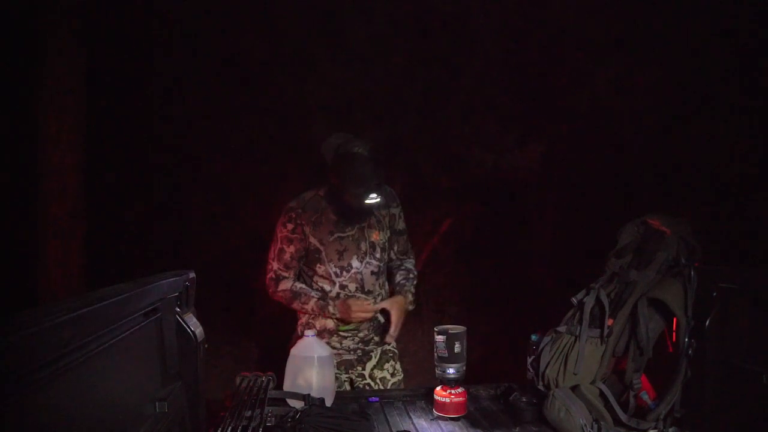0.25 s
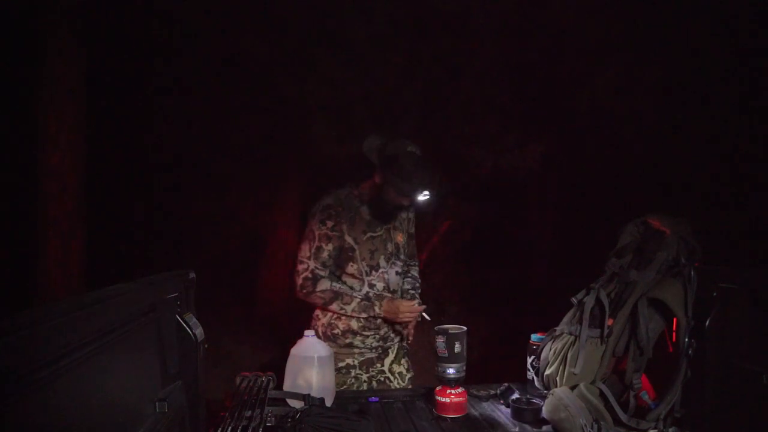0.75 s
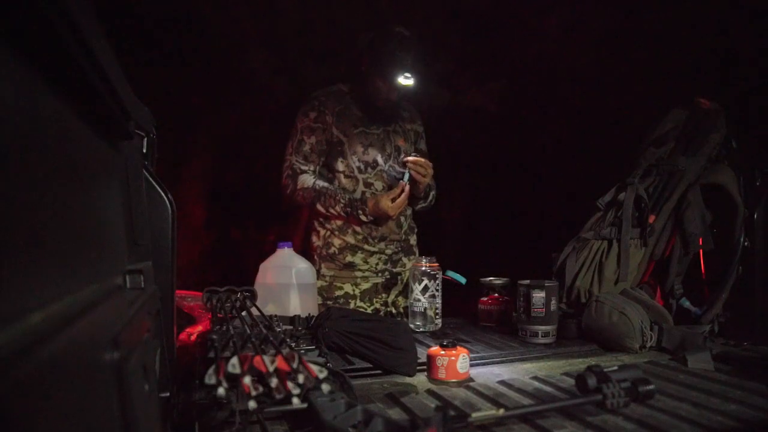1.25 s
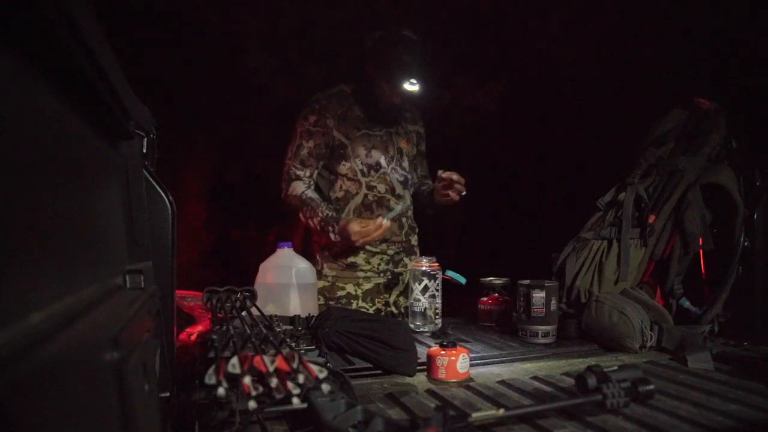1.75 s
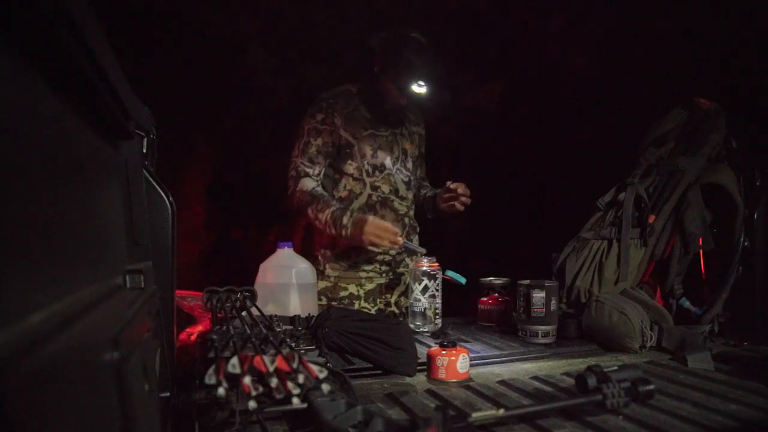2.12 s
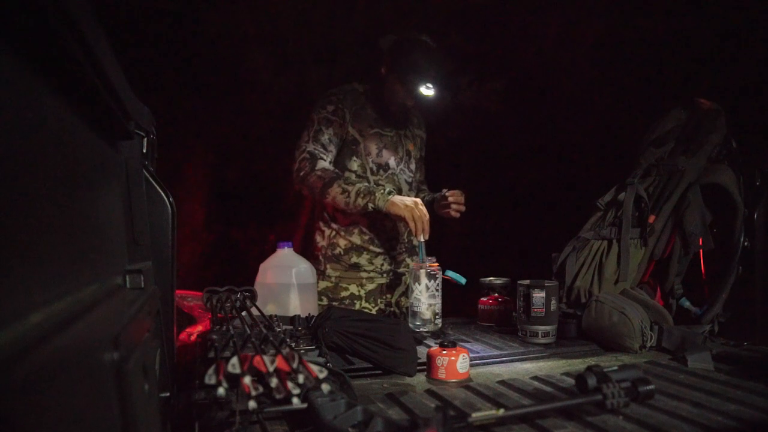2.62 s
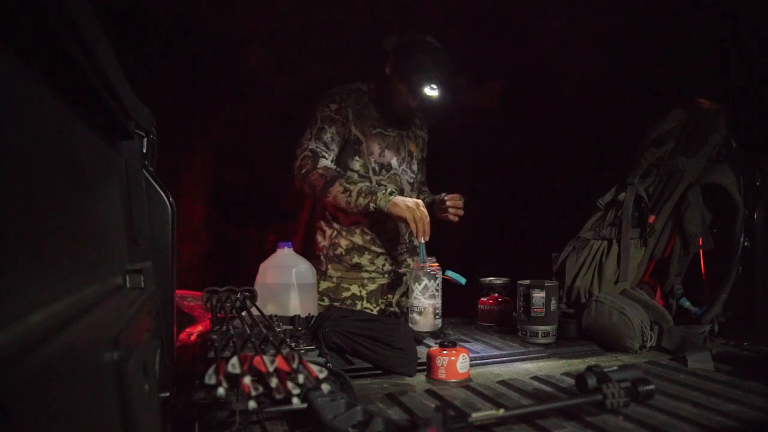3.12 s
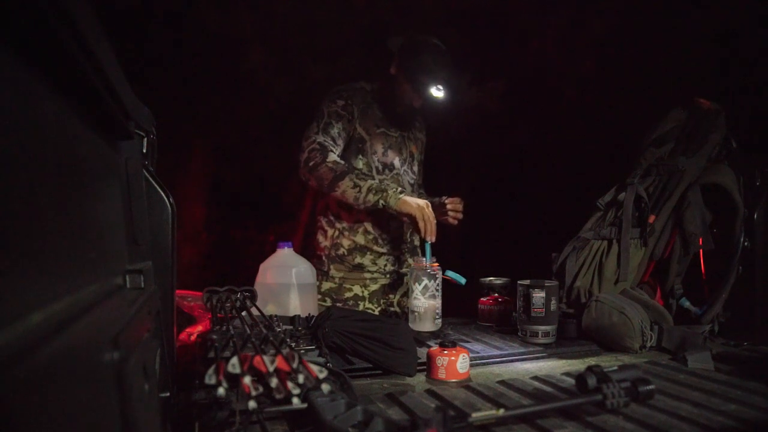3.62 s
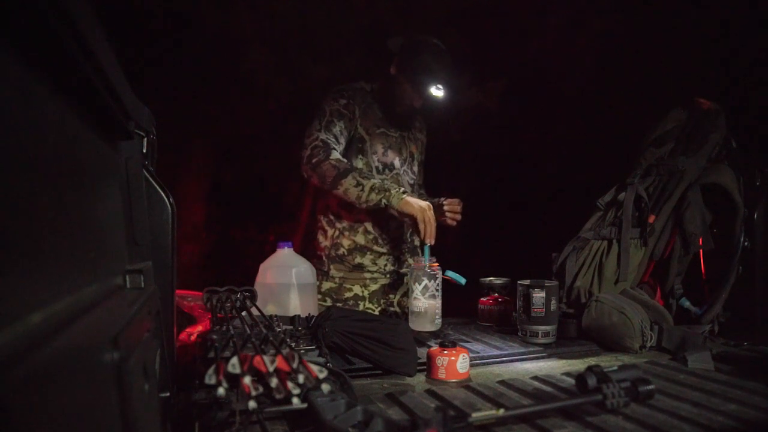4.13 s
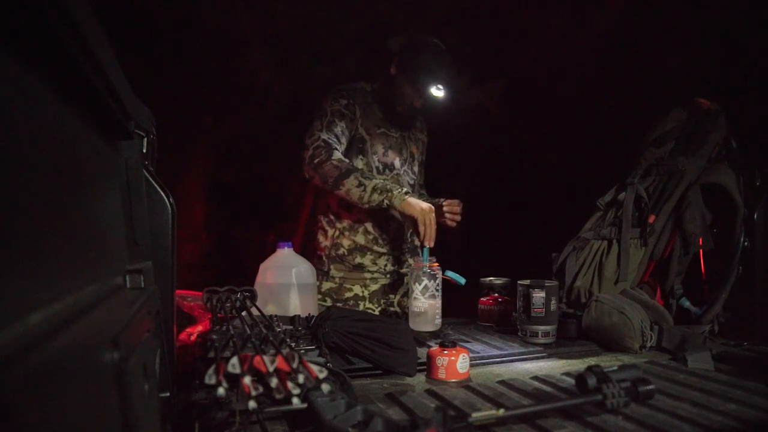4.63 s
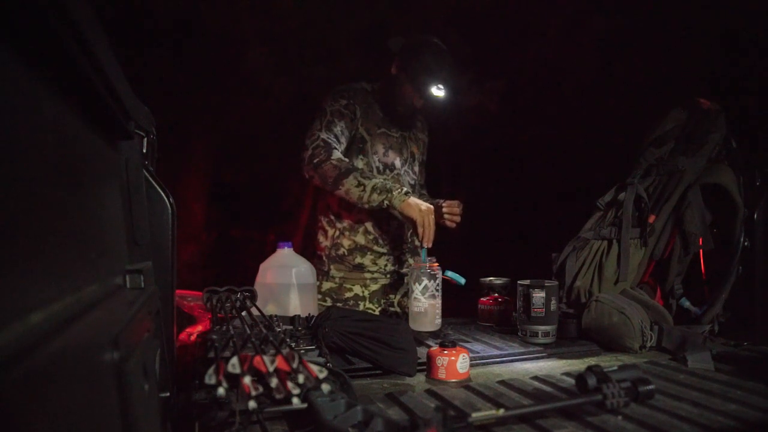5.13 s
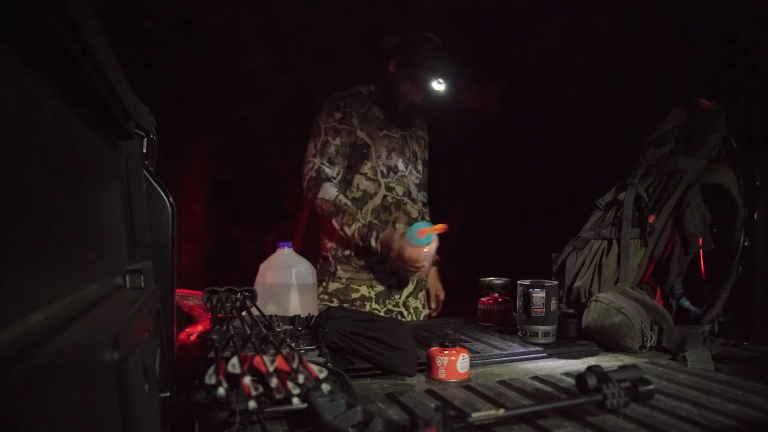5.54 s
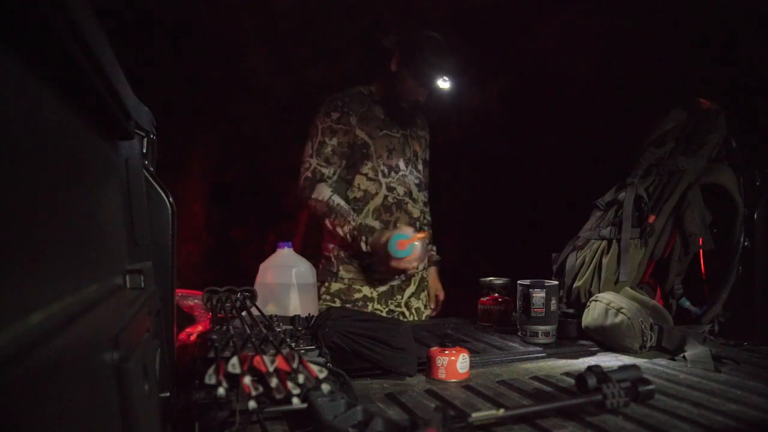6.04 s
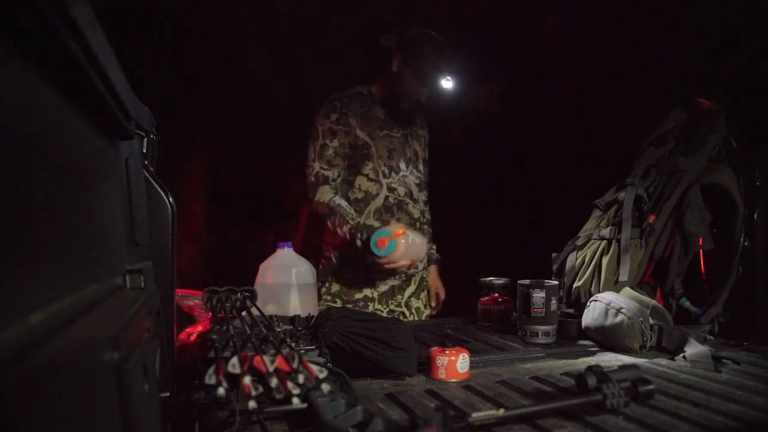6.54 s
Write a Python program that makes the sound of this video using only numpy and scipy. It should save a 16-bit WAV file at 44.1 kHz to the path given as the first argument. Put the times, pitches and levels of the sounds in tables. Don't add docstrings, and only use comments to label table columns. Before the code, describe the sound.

Night outdoors: burner hiss cuts off to crackling foil, trickling powder, rapid hollow stirring knocks, then brisk sloshing in a bottle over engine rumble.

```python
import sys
import numpy as np
from scipy import signal
from scipy.fft import rfft, irfft, next_fast_len
from scipy.io import wavfile
from scipy.ndimage import uniform_filter1d, map_coordinates

SR = 44100
rng = np.random.default_rng(int(sys.argv[2]) if len(sys.argv) > 2 else 0)


def ratio_of_db(decibels):
    return 10 ** (np.asarray(decibels, float) / 20)


def pcm_store(signal):
    levels = np.round(np.clip(np.atleast_2d(signal), -1, 1) * 32767)
    wavfile.write(sys.argv[1], SR, levels.astype(np.int16).T)


N = 298998
T = np.arange(N) / SR

# (frequency [Hz], density [dB per Hz])
FLAME_SPECTRUM = [(700, -31.5), (1400, -13.5), (2200, 1), (3200, -3), (3800, -12), (5000, -40)]
# (frequency [Hz], density [dB per Hz])
JET_SPECTRUM = [(2500, -40), (3400, -4), (4200, -2.5), (5200, -9.5), (6600, -15.5), (9400, -19.5),
                (12300, -23.5), (13200, -36), (15600, -47)]
# (frequency [Hz], width [Hz], level over the jet [dB])
POT_MODES = [(2010, 60, 9), (2360, 90, 7.5), (2770, 33, 11), (3080, 40, 5), (3510, 110, 9.5),
             (4160, 66, 9.5), (4700, 120, 11), (5100, 80, 5), (5750, 100, 3), (6180, 110, 11),
             (7000, 110, 10), (8500, 120, 3), (9400, 200, 3), (10800, 150, 3), (12010, 260, 12),
             (12500, 150, 4)]
# (start [s], end [s], firing rate [Hz])
ENGINE_SCENES = [
    (-.1, .95, 26),
    (0.949, 5.4, 37.65),
    (5.4, 6.9, 26.87),
]
# (multiple of firing rate [1], level [dB])
ENGINE_ORDERS = [
    [(1, 0), (1.82, -7), (3.8, -16)],
    [(1, 0), (2, -12), (3, -15), (3.93, -17), (5.87, -17), (6.4, -20), (7.87, -21)],
    [(1, 0), (1.5, -18)],
]
# (time [s], level [dB])
THROB_LEVEL = [(0, -15.5), (.9, -15.5), (1, -14), (2, -14), (2.3, -15), (3.5, -13.5), (4.6, -14), (5, -17),
               (5.3, -21), (5.45, -14), (6.25, -15), (6.5, -22), (6.78, -26)]
# (frequency [Hz], density [dB per Hz])
RUMBLE_SPECTRUM = [(5, -23), (11, -0.5), (20, 0.5), (28, -8.5), (48, -10.5), (62, -15), (85, -7.5),
                   (130, -9), (220, -16.5), (268, -24.5), (340, -18.5), (420, -35.5), (650, -70.5)]
# (frequency [Hz], density [dB per Hz])
DRONE_SPECTRUM = [(180, -23), (300, -4.5), (520, -10.5), (600, -12.5), (1000, -16), (1400, -20.5),
                  (1900, -25.5), (3300, -29), (4400, -38), (5800, -42.5), (7000, -47.5), (13000, -58.5),
                  (15600, -69)]
# (frequency [Hz], width [Hz], level [dB])
CASING_MODES = [
    [(305, 20, 4), (452, 12, 8), (549, 14, 5), (942, 20, 4)],
    [(576, 14, 4), (937, 10, 9), (1017, 10, 4), (1098, 10, 10), (1330, 16, 8), (1690, 20, 5), (1771, 16, 6),
     (5850, 500, 1)],
]
RUMBLE_LEVELS = [-17.7, -18.3, -18.5]
DRONE_LEVELS = [-29.8, -31.3, -31]
# (first stroke [s], last stroke [s], level [dB], pitch [Hz])
CHIRP_PHRASES = [(.3, .41, -46, 3950), (1.098, 1.2, -42, 4000), (1.752, 1.856, -43, 3950),
                 (2.25, 2.352, -44, 3950), (2.945, 3.05, -46, 4000), (3.59, 3.645, -43, 3980),
                 (4.08, 4.185, -46, 3950), (1.713, 1.713, -41, 3550), (1.91, 1.91, -43, 3780),
                 (2.07, 2.11, -42, 3580), (3.522, 3.522, -42, 3600), (3.68, 3.68, -42, 3580),
                 (1.147, 1.257, -41, 3720), (1.389, 1.489, -43, 3590), (1.642, 1.74, -42, 3600),
                 (1.786, 1.854, -42, 3550), (2.027, 2.171, -46, 3600), (2.428, 2.6, -43, 3620),
                 (2.82, 2.92, -47, 3620), (2.989, 3.039, -41, 3660), (3.167, 3.261, -42, 3620),
                 (3.364, 3.41, -43, 3620), (3.446, 3.5, -42, 3670), (3.598, 3.628, -41, 3570),
                 (3.736, 3.736, -42, 3620), (3.997, 4.041, -43, 3660), (4.402, 4.402, -41, 3550),
                 (4.472, 4.472, -43, 3550), (4.564, 4.564, -44, 3600), (4.853, 4.853, -46, 3750),
                 (5.27, 5.325, -43, 3650), (5.38, 5.38, -41, 3650)]
# (time [s], level [dB], pitch [Hz], dull thud [dB], crisp edge [dB])
FOIL_SNAPS = [(0, -28, 6000, -10, 7), (0.9978, -15, 1450, 0, -18), (0.998, -19, 3600, -5, -8),
              (1.001, -21, 4400, -10, -10), (1.004, -24, 1500, 0, -20), (1.014, -25, 1600, 0, -25),
              (1.0393, -14, 4100, -10, -30), (1.0405, -13, 3000, -4, -36), (1.082, -14, 1300, 0, -34),
              (1.169, -31, 4000, -10, -10), (1.345, -21, 4500, -12, -32), (1.517, -22, 2500, 0, -8),
              (1.5183, -6.5, 3400, -17, -25), (1.5215, -18, 4300, -20, -20), (1.5265, -20, 3300, -20, -25),
              (1.5315, -23, 3100, -20, -25)]
# (time [s], level [dB])
POWDER_FLOW = [(2.14, -75), (2.195, -54), (2.26, -62), (2.308, -51.5), (2.518, -51.5), (2.57, -43.5),
               (2.73, -48.5), (2.91, -40.5), (2.965, -64)]
# (frequency [Hz], density [dB per Hz])
POWDER_SPECTRUM = [(1760, -34), (3000, -11), (3280, -10), (3690, 1), (4410, -14), (5310, 0), (5850, -9),
                   (6900, -16), (9150, -14.5), (10300, -18.5), (13000, -11), (15600, -27)]
# (time [s], body [dB], click [dB], spray [dB], ring [s])
SPOON_KNOCKS = [(3.5857, -19, -29, -45, .063), (3.6908, -13, -15, -42, .06), (3.7761, -5, -14, -31, .081),
                (3.8541, -5.5, -12.5, -41, .056), (3.9432, -5.5, -14.5, -40, .06),
                (4.0304, -7, -21.5, -44, .058), (4.118, -5.5, -15, -39, .056),
                (4.1975, -5.5, -17.5, -45, .054), (4.286, -7.5, -22.5, -46, .086),
                (4.3704, -9.5, -27, -51, .084), (4.449, -10.5, -16.5, -36, .09),
                (4.529, -5, -17, -39, .096), (4.6184, -9, -15.5, -38, .124), (4.7027, -4.5, -17, -39, .1),
                (4.7905, -6.5, -19.5, -38, .07), (4.886, -6.5, -18, -48, .13),
                (4.9686, -11, -17.5, -30, .095), (5.0636, -5, -15, -41, .081),
                (5.1545, -6.5, -17.5, -39, .068)]
# (pitch [Hz], twin [dB], upper [dB], lower [dB], lag [s])
BODY_MODES = [(395, -12, -12, -14, .001), (395, -8, -12, -9, 0), (393, -20, -14, -18, .0004),
              (412, -14, -7, -14, .001), (385, -18, -12, -15, 0), (408, -14, -8, -14, .002),
              (388, -18, -15, -16, .0002), (410, -16, -8, -14, .001), (388, -10, -10, -16, .0015),
              (403, -20, -12, -11, .0028), (410, -5, -16, -14, .004), (397, -20, -18, -20, .0002),
              (409, -3, -14, -14, .002), (397, -20, -20, -15, .001), (385, -6, -14, -11, 0),
              (398, -20, -18, -14, .0004), (414, -8, -14, -16, .0039), (398, -20, -10, -1, .0007),
              (389, -12, -13, -15, .0004)]
STRIKE_POINTS = [(0, 0, 0, 0), (8, -4, 2, 6), (2, -6, 5, 2), (-5, 4, -2, 7), (-3, 8, 0, -5), (-8, 9, -3, 0),
                 (5, 5, 3, -3), (-7, 4, 2, -3), (-2, -5, 5, 0), (-4, 3, 1, -2), (4, -5, 4, -2),
                 (1, 1, -2, -1), (-2, 0, 1, -6), (0, 7, 2, -6), (-4, 0, -5, -2), (3, 8, -3, -4),
                 (5, 4, -2, -5), (1, 8, 3, -12), (0, -1, 3, -8)]
# (frequency [Hz], level [dB], decay T60 [s])
WALL_MODES = [(627, -24.5, 0.057), (1000, -18.5, 0.017), (2250, -21.5, 0.016), (5000, -29, .014)]
GRAZE_TIMES = [3.579, 3.6, 3.8097, 4.8334, 5.0094]
# (body [dB], click [dB], spray [dB], ring [s])
GRAZE_FORCE = (-25, -32, -53, .11)
# (frequency [Hz], gain [dB])
CLICK_SPECTRUM = [(500, 3), (1000, -2), (1600, -5), (2200, -8.5), (3300, -9), (5200, -14), (7000, -25),
                  (10000, -32), (16000, -42)]
# (frequency [Hz], gain [dB])
SPRAY_SPECTRUM = [(4000, -26), (6500, -6), (9500, -4), (12500, 2), (14000, -3), (15700, -15)]
# (time [s], exhaust pitch [Hz], level [dB])
VEHICLE_PASS = [(4.7, 225.6, -46), (4.8, 235.5, -29), (5.43, 228.0, -30.5), (5.6, 239.8, -25.5),
                (6.32, 234.4, -26.5), (6.78, 222.4, -33)]
# (frequency [Hz], density [dB per Hz])
WASH_SPECTRUM = [(710, -62), (1200, -1.5), (1640, -1.5), (1790, -3), (2580, -2), (3350, -6), (3850, -3.5),
                 (5310, -9.5), (7500, -38.5), (9750, -54), (16500, -120)]
# (frequency [Hz], density [dB per Hz])
FOAM_SPECTRUM = [(3530, -27), (6000, -6.5), (7320, -10), (9230, -10.5), (12500, -17), (13800, -15),
                 (15600, -31)]
# (frequency [Hz], density [dB per Hz])
SLAP_SPECTRUM = [(220, -17), (380, 2), (423, -28), (461, -7.5), (792, -1), (989, -5), (1600, -21.5),
                 (2080, -40), (3520, -120)]
# (time [s], force [dB], slap over force [dB], foam over force [dB])
WATER_SURGES = [(5.526, -21.5, 2, -24), (5.61, -26, 6, -19), (5.655, -25, 2, -21), (5.7, -30, 0, -27),
                (5.76, -19, 2, -20), (5.81, -25, -5, -25), (5.89, -26, -1, -18), (5.956, -26, 1, -19),
                (6.022, -20.5, 9, -24), (6.09, -22.5, -7, -21), (6.16, -25, 3, -23), (6.225, -27, 4, -21),
                (6.28, -23, 8, -25), (6.355, -23.5, -7, -19), (6.395, -23, 3, -21), (6.535, -23, 9, -24),
                (6.575, -27, 2, -27), (6.645, -21, -4, -24), (6.765, -28, -1, -21)]
# (rise [dB per s], fall [dB per s])
SURGE_SLOPES = [
    (230, 200),
    (350, 280),
    (220, 370),
]
# (time [s], level [dB], pitch [Hz])
WATER_THUMPS = [(5.49, -12, 721), (5.5285, -2, 694), (5.607, -5, 697), (5.74, -9, 947), (5.763, 3, 810),
                (5.89, -4, 750), (5.948, -7, 665), (5.995, -11, 600), (6.018, -2, 734), (6.149, -12, 581),
                (6.405, -6, 1200), (6.512, -6, 816), (6.573, -8, 740), (6.178, -6, 533), (6.202, -3, 740),
                (6.23, -5, 931), (6.257, -3, 939), (6.288, -6, 807), (6.349, -13, 789), (6.482, -10, 541),
                (6.548, -3, 600)]
# (time [s], level [dB], pitch [Hz])
DROP_SMACKS = [(5.432, -21.5, 1820), (5.4593, -20, 3700), (5.4872, -15.5, 3740), (5.5172, -13, 2590),
               (5.5895, -15, 2240), (5.626, -16, 2510), (5.6504, -17.5, 2440), (5.734, -14, 3820),
               (5.8654, -24, 3730), (5.9433, -22.5, 2010), (5.9965, -11, 2140), (6.145, -14.5, 2910),
               (6.2158, -13, 2770), (6.2575, -16, 2240), (6.458, -24, 3660), (6.478, -22, 2650),
               (6.4956, -22, 2500), (6.5157, -18.5, 2350), (6.587, -17, 3964), (6.6255, -6, 3300),
               (6.7196, -19, 1870), (6.7513, -20.5, 2380)]


def unit(x):
    return x / np.sqrt(np.mean(x ** 2) + 1e-20)


def curves(rows, outside=None):
    s, *cols = np.transpose(rows)
    return [np.interp(T, s, c, outside, outside) for c in cols]


def wobble(rate):
    knots = rng.standard_normal(int(N * rate / SR) + 4)
    return np.interp(T, T[::8], map_coordinates(knots, [T[::8] * rate]))


def along(points, hz):
    f, v = np.transpose(points)
    return ratio_of_db(np.interp(np.log(hz + 1), np.log(f + 1), v))


def band(hz, width_hz):
    return lambda f: (f * width_hz) ** 2 / ((f * f - hz * hz) ** 2 + (f * width_hz) ** 2)


def ping(hz, db, t60):
    t = T[:4096]
    return ratio_of_db(db - 60 * t / t60) * np.sin(2 * np.pi * hz * t)


def burst(colour, t60):
    t = T[:4096]
    noise = rfft(rng.standard_normal(len(t)))
    noise = irfft(noise * colour(np.fft.rfftfreq(len(t), 1 / SR) + 1))
    return unit(noise) * ratio_of_db(-60 * t / t60) * (1 - np.exp(-t / 0.00041))


def rush(spectrum, patchy_db, peaks=(), grain=0, size=(6, 8)):
    z = signal.stft(rng.standard_normal(N) * ratio_of_db(grain * wobble(500)), nperseg=512)[2]
    patches = uniform_filter1d(rng.standard_normal(z.shape), size[0], 0)
    patches = uniform_filter1d(patches, size[1], 1)
    x = signal.istft(z * ratio_of_db(patchy_db * unit(patches)), nperseg=512)[1][:N]
    m = next_fast_len(N, True)
    hz = np.fft.rfftfreq(m, 1 / SR)
    power = 1 + sum(ratio_of_db(2 * db) / (1 + (2 * (hz - c) / w) ** 2) for c, w, db in peaks)
    return unit(irfft(rfft(x, m) * along(spectrum, hz) * np.sqrt(power), m)[:N])


def add(out, s, x):
    part = out[max(round(s * SR), 0):][:len(x)]
    part += x[:len(part)]


def burner():
    cut_db = -np.clip(T - .975, 0, .1) * 1100
    flare_db = 3 * np.exp(-(T / .3) ** 2)
    flicker_db = .6
    flame_db = -38.8 + flare_db + flicker_db * wobble(6) + cut_db
    jet_db = -38.8 - .7 * flare_db + flicker_db * wobble(4) + cut_db
    flame = rush(FLAME_SPECTRUM, patchy_db=1.8, peaks=POT_MODES, size=(2, 30))
    jet = rush(JET_SPECTRUM, patchy_db=1.8, peaks=POT_MODES, size=(2, 30))
    return ratio_of_db(flame_db) * flame + ratio_of_db(jet_db) * jet


def engine():
    throb = np.zeros(N)
    for (start, end, hz), orders in zip(ENGINE_SCENES, ENGINE_ORDERS):
        turns = np.cumsum(hz * (1 + 0.0031 * wobble(3))) / SR
        gate = np.clip(np.minimum(T - start, end - T) / 0.023 + .5, 0, 1)
        for k, db in orders:
            unsteady_db = min(k // 2, 1) * 2.55 * wobble(5)
            throb += gate * ratio_of_db(db + unsteady_db) * np.sin(2 * np.pi * (k * turns + rng.random()))
    second, third = ENGINE_SCENES[1][0], ENGINE_SCENES[2][0]
    which = np.searchsorted([second, third], T)
    load_db = .8 * wobble(2.5)
    rumble_db = np.take(RUMBLE_LEVELS, which) + load_db
    drone_db = np.take(DRONE_LEVELS, which) + .5 * load_db + 2.5
    rumble = rush(RUMBLE_SPECTRUM, patchy_db=0.77)
    first_drone, later_drone = [rush(DRONE_SPECTRUM, patchy_db=0.83, peaks=p) for p in CASING_MODES]
    drone = np.where(T < second, first_drone, later_drone)
    return ratio_of_db(curves(THROB_LEVEL)[0] + 2.5) * throb + ratio_of_db(rumble_db) * rumble + ratio_of_db(drone_db) * drone


def crickets():
    out, t = np.zeros(N), T[:round(.03 * SR)]
    stroke_gap_s = .052
    strokes = []
    for first, last, db, hz in CHIRP_PHRASES:
        for at in np.linspace(first, last, round((last - first) / stroke_gap_s) + 1):
            strokes.append((at, db + rng.normal(0, 1.5), hz * (1 + rng.normal(0, .012))))
    chorus_db = -49.7 + 1.5 * wobble(1)
    places = np.linspace(0, 1, 500) + rng.normal(0, .001, 500)
    for place, (loudness, tuning) in zip(places, rng.random((500, 2))):
        swell_db = chorus_db[round(np.clip(place, 0, 1) * (N - 1))]
        strokes.append((6.78 * place, swell_db + 0.5 + 4 * loudness, 3430 + 400 * tuning))
    for at, db, hz in strokes:
        pitch = hz * (1 + .11 * (.5 - t / t[-1]))
        tone = np.sin(np.pi * t / t[-1]) * np.sin(2 * np.pi * np.cumsum(pitch) / SR)
        add(out, at - t[-1] / 2, ratio_of_db(db + .3) * tone)
    return out * (1 + .4 * wobble(350))


def sachet():
    flow_db = curves(POWDER_FLOW, -120)[0] + 3
    out = ratio_of_db(flow_db) * rush(POWDER_SPECTRUM, patchy_db=0.0, grain=1.2)
    for s, db, hz, thud_db, crisp_db in FOIL_SNAPS:
        t60 = .044 + .001 * db
        snap = ping(hz, 3, .5 * t60)
        snap += ratio_of_db(-5) * burst(band(hz, 0.35 * hz), t60)
        snap += ratio_of_db(-17) * burst(band(hz, 1.1 * hz), .5 * t60)
        snap += ratio_of_db(thud_db) * burst(band(1350, 900), t60)
        snap += ratio_of_db(crisp_db) * burst(band(10000, 14000), 0.67 * t60)
        add(out, s, ratio_of_db(db - 4.5) * snap)
    return out


def spoon():
    def click_colour(f):
        return along(CLICK_SPECTRUM, f)

    def spray_colour(f):
        return along(SPRAY_SPECTRUM, f)

    out, t = np.zeros(N), T[:4096]
    pair_hz, upper_hz, lower_hz = 398, 476, 345
    knocks = list(zip(SPOON_KNOCKS, BODY_MODES, STRIKE_POINTS))
    knocks += [((s, *GRAZE_FORCE), BODY_MODES[0], STRIKE_POINTS[0]) for s in GRAZE_TIMES]
    for (s, body_db, click_db, spray_db, ring_s), modes, struck in knocks:
        hz, twin_db, upper_db, lower_db, lag = modes
        body = ping(hz, 0, .25) + ping(2 * pair_hz - hz, twin_db, .25)
        body += ping(upper_hz, upper_db + 5.5, .075) + ping(lower_hz, lower_db, .09)
        damping = ratio_of_db(-60 * (t / np.clip(ring_s, .05, .15)) ** 2)
        onset = 1 - np.exp(-t / 0.0035)
        add(out, s + np.clip(lag, 0, .007), ratio_of_db(body_db + 3.5) * body * damping * onset)
        wall = sum(ping(f * (1 + rng.normal(0, 0.025)), db + more_db, t60)
                   for (f, db, t60), more_db in zip(WALL_MODES, struck))
        click = burst(click_colour, 0.03) + ratio_of_db(-6.5) * burst(click_colour, 0.079)
        tick = ping(12500 * (1 + rng.normal(0, .04)), 5, .004) + burst(spray_colour, 0.008)
        spray = ratio_of_db(spray_db + 3.5) * tick + ratio_of_db(.5 * spray_db - 28.5) * burst(spray_colour, 0.06)
        add(out, s, ratio_of_db(click_db - 5.5) * click + ratio_of_db(click_db + 16) * wall + spray)
    return out


def vehicle():
    hz, db = curves(VEHICLE_PASS)
    turns = np.cumsum(hz) / SR
    half_order = ratio_of_db(-6 + 3.6 * wobble(3.5)) * np.sin(np.pi * turns)
    note = np.sin(2 * np.pi * turns) + half_order
    return ratio_of_db(db + 4.5) * np.clip((T - 4.6) / .15, 0, 1) * note


def surge(times, db, rise, fall):
    late = T[round(5.3 * SR):] - np.array(times)[:, None]
    level_db = np.array(db)[:, None] + np.minimum(rise * late, -fall * late)
    gain = np.sqrt(np.sum(ratio_of_db(2 * level_db), 0))
    return np.pad(gain, (N - len(gain), 0))


def shaking():
    at, force_db, slap_db, foam_db = np.transpose(WATER_SURGES)
    flow, slap, foam = [surge(at, force_db + db, *slope)
                        for db, slope in zip((0, slap_db, foam_db), SURGE_SLOPES)]
    wash, t = rush(WASH_SPECTRUM, patchy_db=1.8, grain=2, size=(8, 5)), T[:600]
    for when, tuning, loudness in rng.random((450, 3)):
        hz = 1200 * 6 ** tuning
        decay = ratio_of_db(-13.5 + 16 * loudness ** 2 - 60 * t * hz / 22)
        bubble = decay * np.sin(2 * np.pi * hz * t * (1 + 12 * t))
        add(wash, 5.4 + 1.38 * when, bubble)
    out = ratio_of_db(-3) * flow * wash
    out += ratio_of_db(2.2) * foam * rush(FOAM_SPECTRUM, patchy_db=1.0, grain=3)
    out += ratio_of_db(-2.5) * slap * rush(SLAP_SPECTRUM, patchy_db=0.5, grain=2.2)
    thump_t60, smack_t60 = .06, .032
    for s, db, hz in WATER_THUMPS:
        thump = ratio_of_db(-3) * burst(band(hz, 0.84 * hz), thump_t60) + ping(hz, 1, .6 * thump_t60)
        add(out, s, ratio_of_db(db - 13.5) * thump)
    for s, db, hz in DROP_SMACKS:
        smack = burst(band(hz, 0.4 * hz), smack_t60) + ping(hz, -8, .6 * smack_t60)
        add(out, s, ratio_of_db(db - 6.5) * smack)
    return out * (T > 5.4)


def scene():
    return (burner() + engine() + crickets() + sachet() + spoon() + vehicle() + shaking())[None]


def band_limit(x):
    return signal.sosfilt(signal.butter(12, 15700, fs=SR, output="sos"), x)


def record(dry):
    m = next_fast_len(N, True)
    passed = np.fft.rfftfreq(m, 1 / SR) < 15700
    mix = irfft(rfft(dry, m) * passed, m)[:, :N]
    mix = mix / (1 + np.abs(mix) ** 20) ** (1 / 20)
    return band_limit(mix)


dry = scene()
out = record(dry)
pcm_store(out)
```